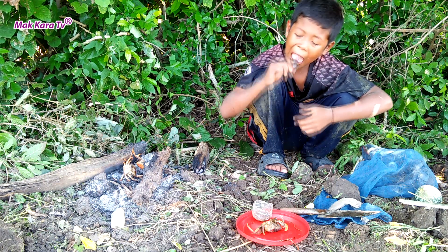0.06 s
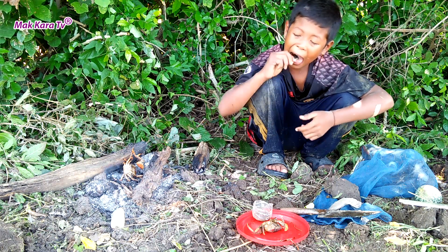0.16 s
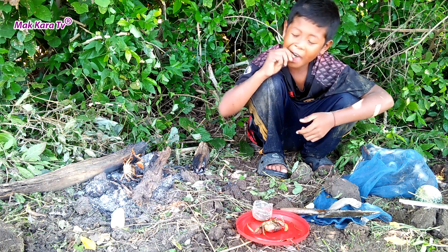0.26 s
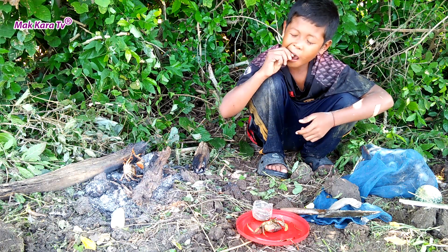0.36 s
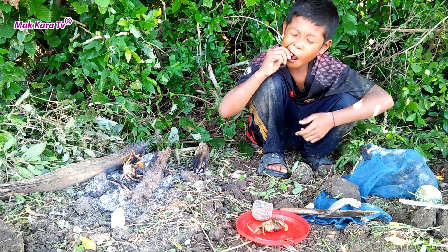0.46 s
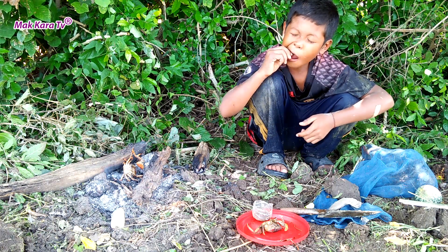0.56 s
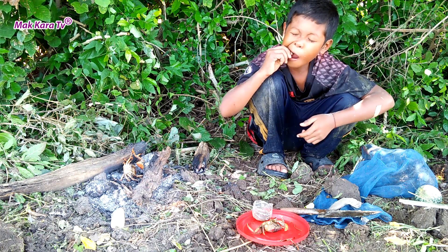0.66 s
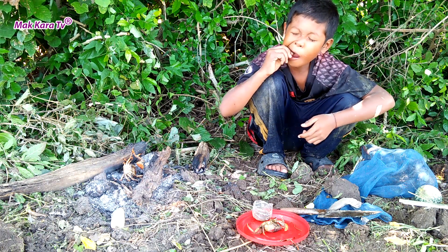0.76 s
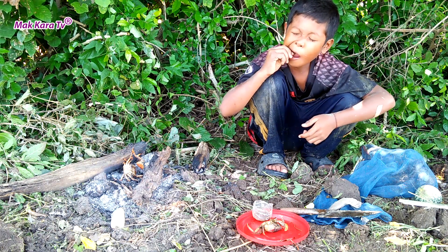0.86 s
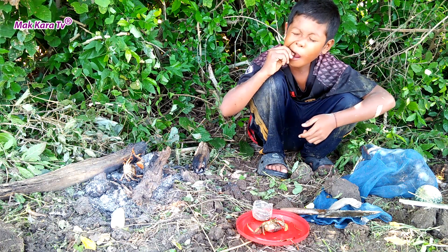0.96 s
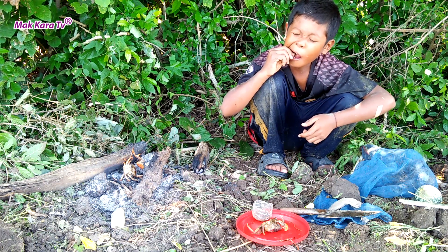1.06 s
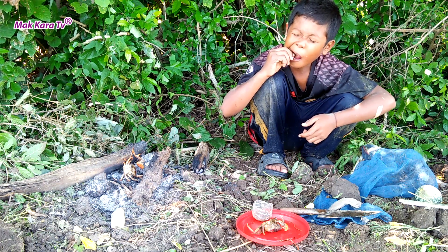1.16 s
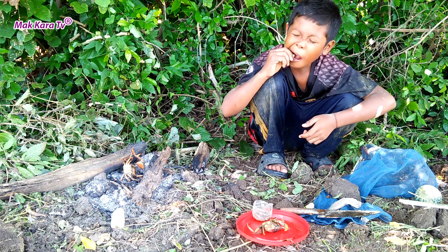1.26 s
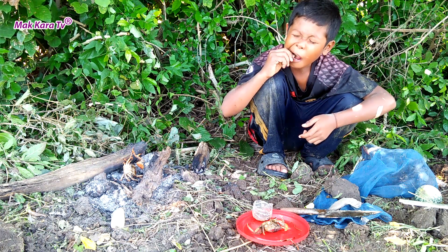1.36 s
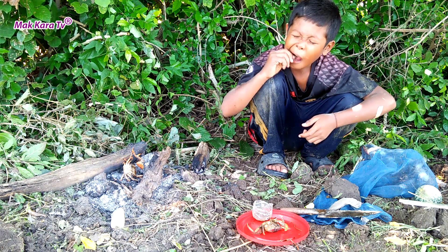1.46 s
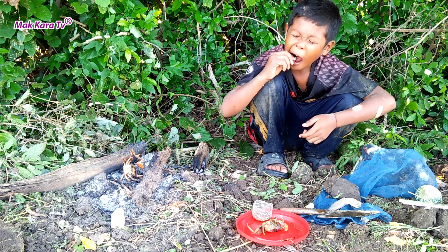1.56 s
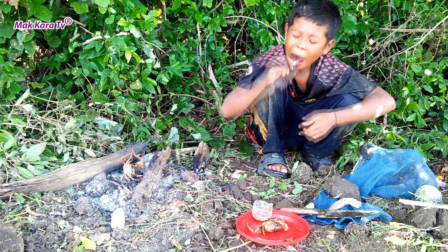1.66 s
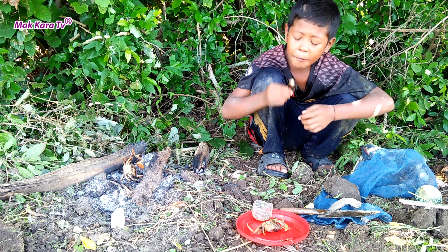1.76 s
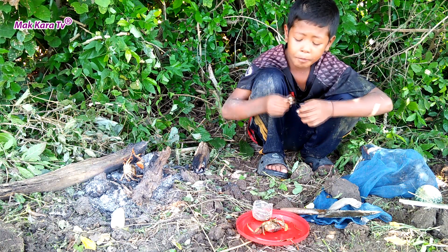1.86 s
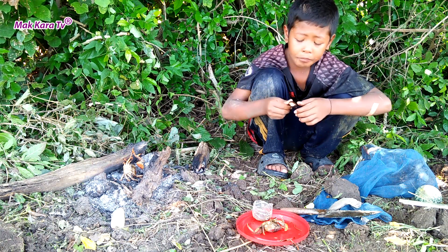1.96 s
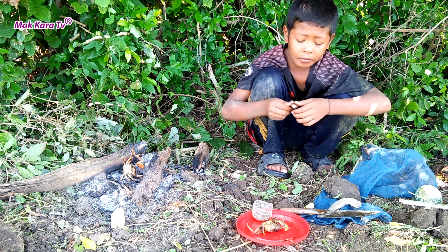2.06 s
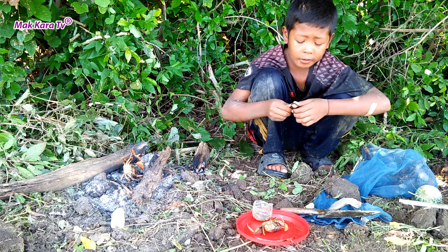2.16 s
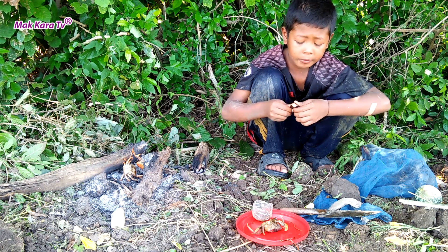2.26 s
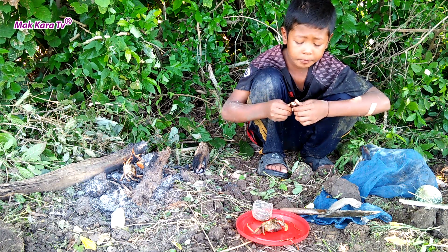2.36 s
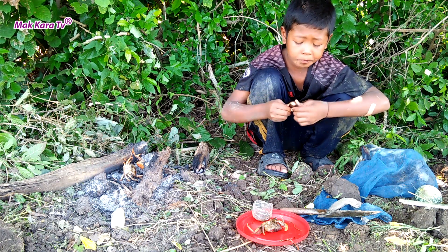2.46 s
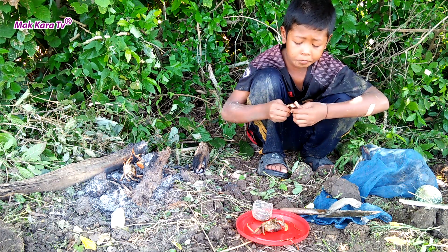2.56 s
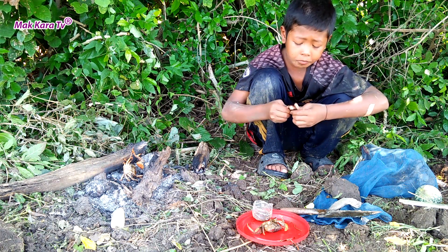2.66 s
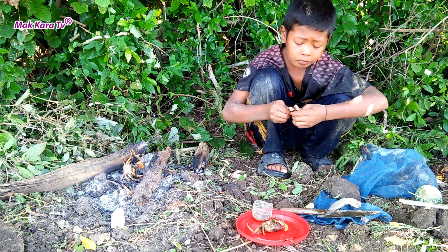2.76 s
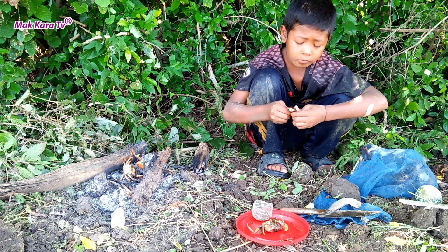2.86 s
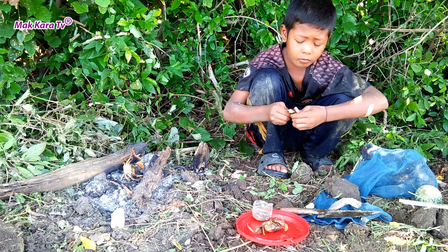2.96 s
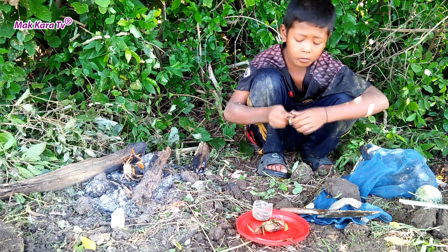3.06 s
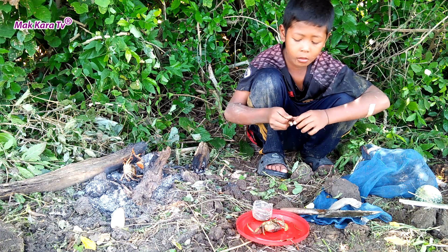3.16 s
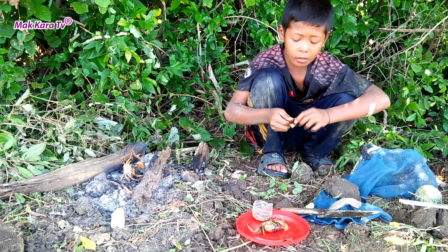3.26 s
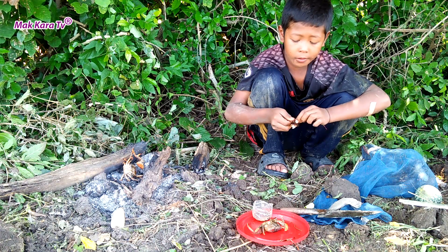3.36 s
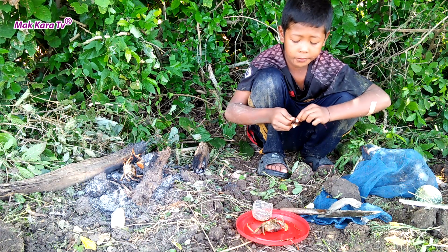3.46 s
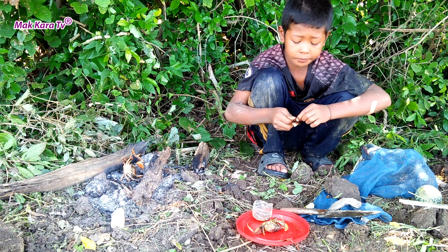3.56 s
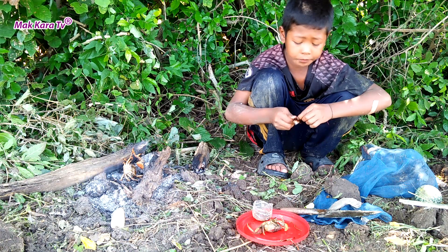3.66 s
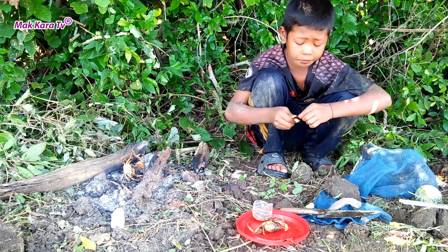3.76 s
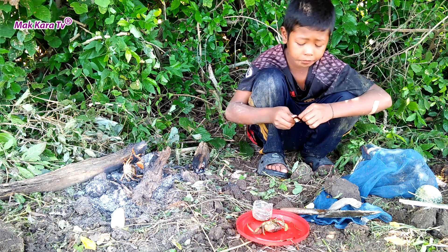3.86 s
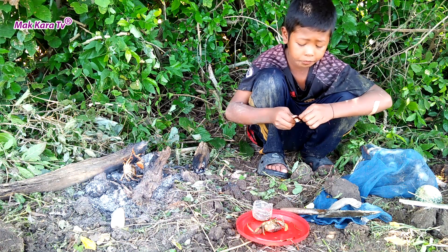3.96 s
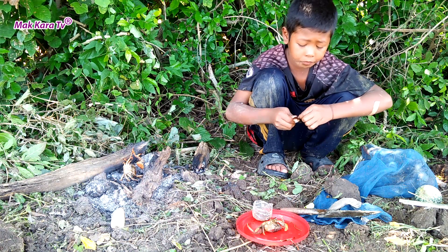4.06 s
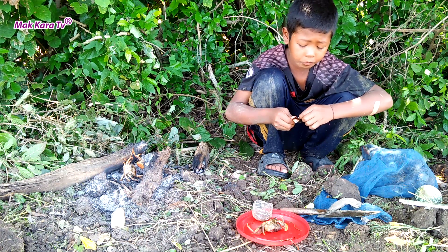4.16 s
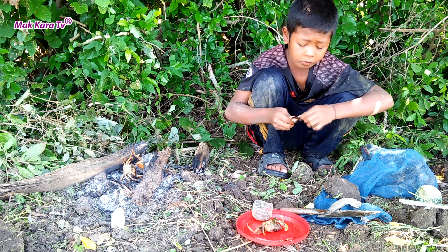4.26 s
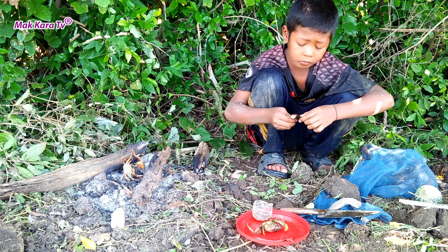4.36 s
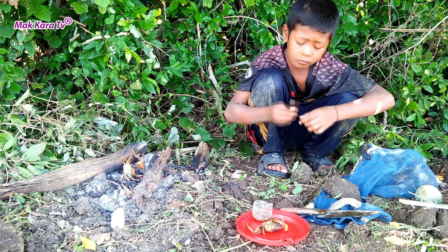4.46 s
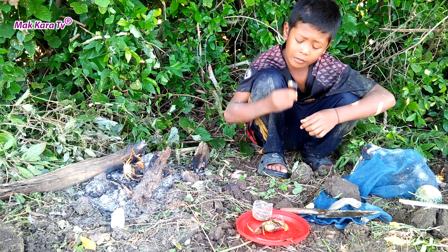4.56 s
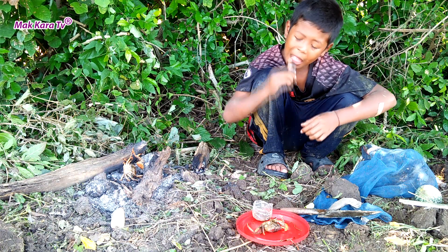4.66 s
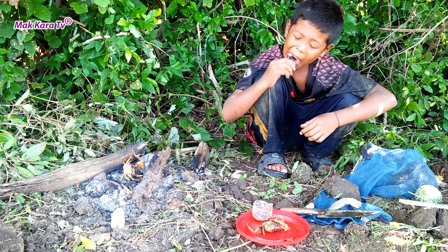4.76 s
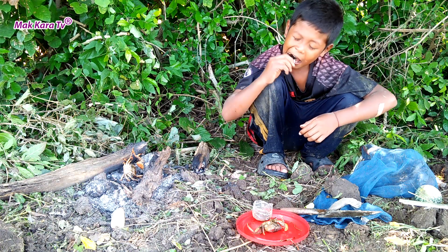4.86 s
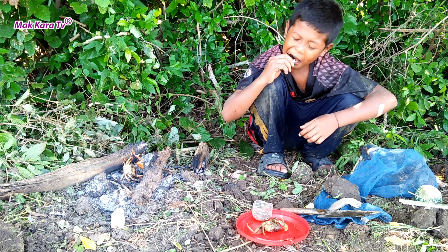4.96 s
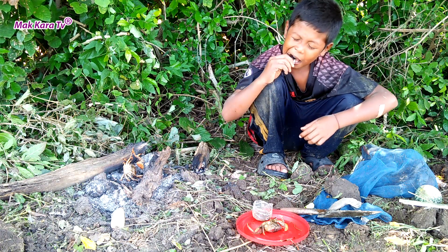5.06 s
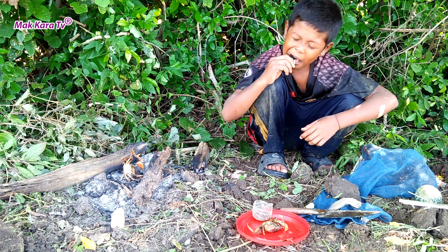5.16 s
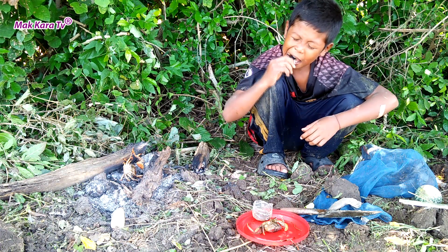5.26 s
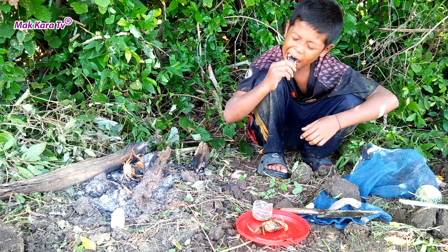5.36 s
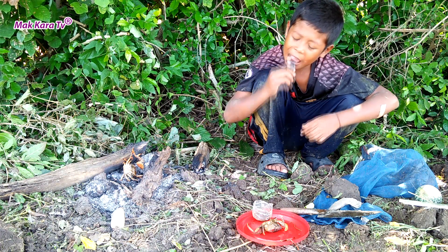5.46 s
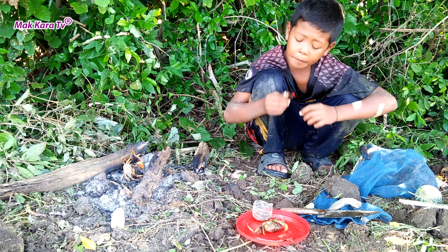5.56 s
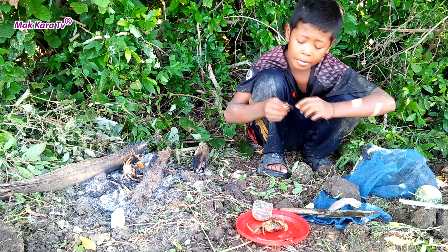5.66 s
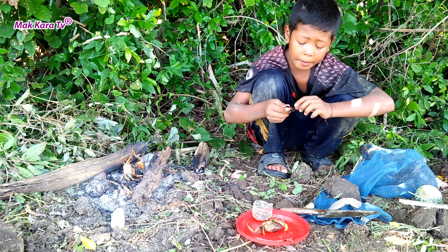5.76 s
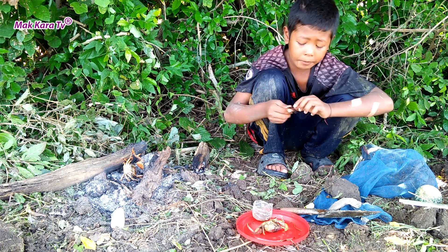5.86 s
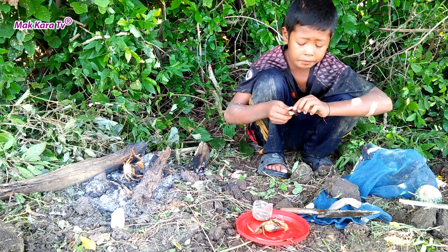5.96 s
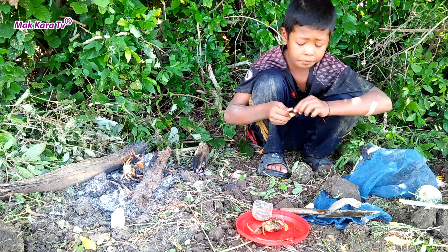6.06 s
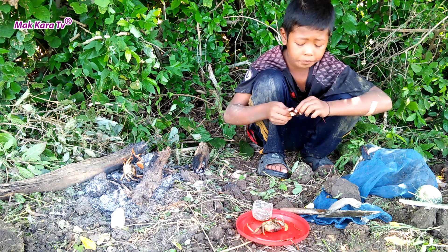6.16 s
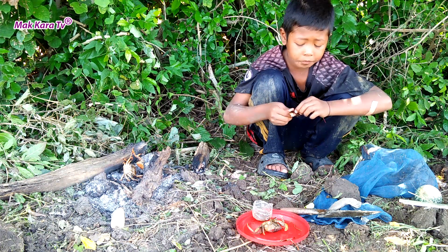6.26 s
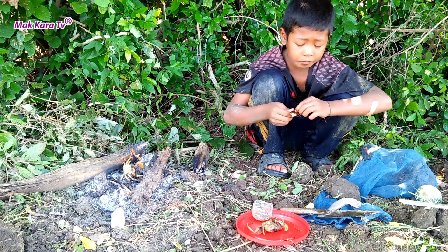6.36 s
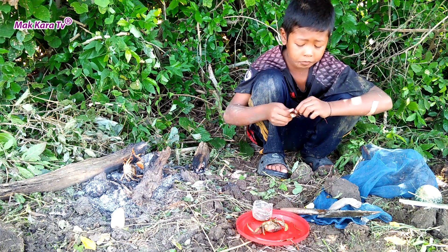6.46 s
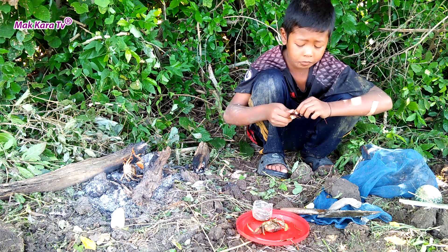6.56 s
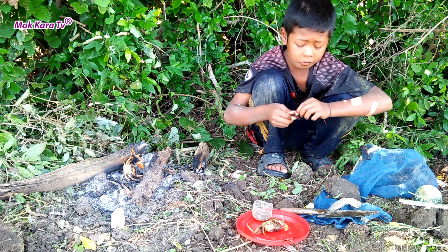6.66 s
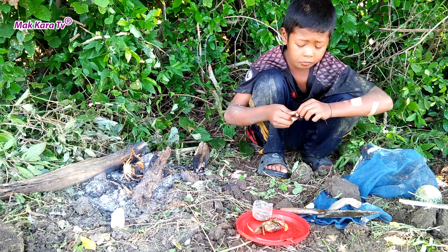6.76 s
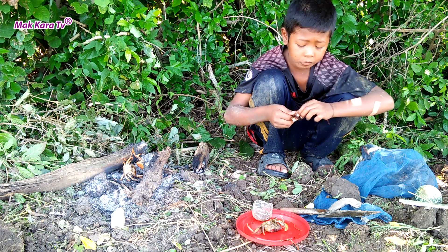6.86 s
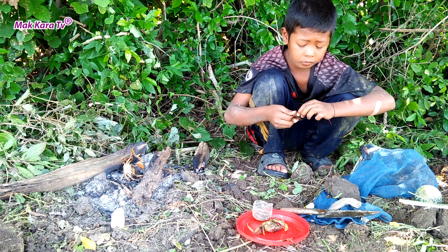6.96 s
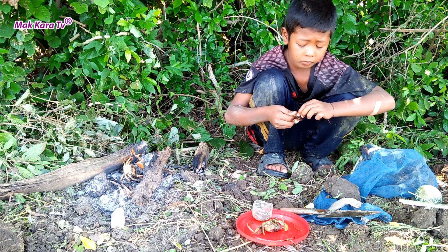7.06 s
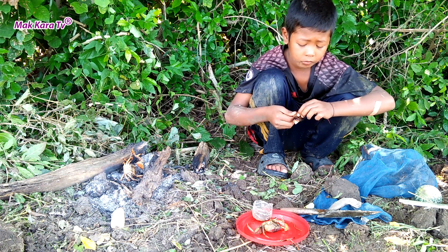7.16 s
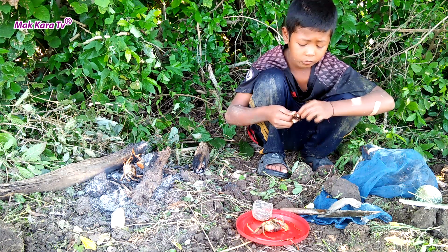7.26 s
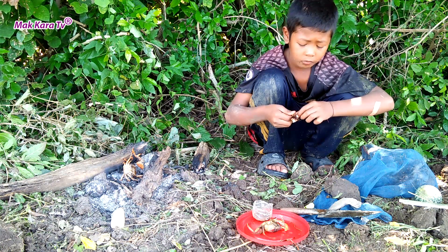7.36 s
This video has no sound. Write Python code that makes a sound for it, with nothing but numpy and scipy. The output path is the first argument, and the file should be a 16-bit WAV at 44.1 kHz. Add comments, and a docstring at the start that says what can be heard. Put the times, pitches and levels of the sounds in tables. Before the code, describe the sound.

Close outdoors, brittle shell cracks crisply between teeth in an uneven run about a second in, followed by small wet smacks and faint picking by fingers. A long quiet stretch passes, then a tight cluster of cracks snaps past five seconds. Soft rustling comes and goes. Beneath it all, low air rumble and a far single-cylinder engine chug steadily.

```python
"""Sharp shell cracks in two bouts: someone squatting by a small fire bites through a grilled crab leg.
Each crack is an impulse and torn noise grains, ringing the splinter and mouth; the hedge scatters it.
Lips smack and fingers pick in resonant ticks; a soft rustle of shaped noise comes and goes.
Far away a slow single-cylinder engine chugs as a train of low pulses, with a thin wavering whine,
over a low rumble of air, small buffets and a distant wash, all made from coloured noise."""
import sys
import numpy as np
from scipy import signal
from scipy.fft import rfft, irfft, next_fast_len
from scipy.io import wavfile
from scipy.ndimage import uniform_filter1d, map_coordinates

SR = 44100
rng = np.random.default_rng(int(sys.argv[2]) if len(sys.argv) > 2 else 0)


def generate_wav(signal):
    """Clip the signal to [-1, 1] and save it as 16-bit WAV at the path in sys.argv[1]."""
    frames = np.transpose(np.atleast_2d(signal))
    scaled = np.clip(frames, -1, 1) * 32767
    pcm = np.round(scaled).astype(np.int16)
    wavfile.write(sys.argv[1], SR, pcm)


N = 326635  # samples


def amp(db):
    """Level to amplitude ratio: 20 dB is a factor of ten."""
    return 10 ** (np.asarray(db) / 20)


def unit(x):
    """Power normalisation: x at rms 1."""
    return x / np.sqrt(np.mean(x ** 2) + 1e-20)


def sized(x):
    """Energy normalisation: x with its squares summing to 1."""
    return x / np.linalg.norm(x)


def along(points, hz):
    """Logarithmic frequency scale: interpolate (f/Hz, value) points on it."""
    f, v = np.transpose(points)
    return np.interp(np.log(hz + 1), np.log(f + 1), v)


def curves(rows):
    """Linear interpolation: one value per sample for each column after the time."""
    s, *cols = np.transpose(rows)
    return [np.interp(np.arange(N) / SR, s, c) for c in cols]


def wobble(rate):
    """Band-limited fluctuation: a smooth curve through random knots, rate of them a second."""
    knots = rng.standard_normal(int(N * rate / SR) + 4)
    return map_coordinates(knots, [np.arange(N) * rate / SR])


def swell(s, length):
    """Gaussian envelope: a bell of standard deviation length, in seconds, around time s."""
    return np.exp(-((np.arange(N) / SR - s) / length) ** 2 / 2)


def fade(t, t60):
    """Exponential decay: 60 dB lost in t60 seconds."""
    return amp(-60 * t / t60)


def filtered(x, response):
    """Linear filtering: the spectrum of x times a response of frequency."""
    m = next_fast_len(len(x) + 8192)  # zero padding leaves room for the filter's tail
    return irfft(rfft(x, m) * response(np.fft.rfftfreq(m, 1 / SR)), m)[:len(x)]


def coloured(x, spectrum):
    """Minimum phase: a causal filter of the given (f/Hz, level/dB) shape, by folding its cepstrum."""
    size = 2048
    cepstrum = irfft(np.log(amp(along(spectrum, np.fft.rfftfreq(size, 1 / SR)))))
    cepstrum[1:size // 2] *= 2
    cepstrum[size // 2 + 1:] = 0
    impulse_response = irfft(np.exp(rfft(cepstrum)))
    return signal.fftconvolve(x, impulse_response)[:len(x)]


def resonance(x, hz, width):
    """Damped oscillator: x through one resonance of the given width in Hz."""
    return filtered(x, lambda f: 1j * f * width / (hz * hz - f * f + 1j * f * width))


def band(x, hz, width):
    """Cascaded resonators: two equal resonances in series, with the output energy set to 1."""
    return sized(resonance(resonance(x, hz, width), hz, width))


def rush(spectrum, patchy_db):
    """Turbulent noise: random patches of gain in time and frequency, then a spectral shape, at rms 1."""
    z = signal.stft(rng.standard_normal(N), nperseg=1024)[2]
    across_hz = uniform_filter1d(rng.standard_normal(z.shape), size=5, axis=0)
    patches = unit(uniform_filter1d(across_hz, size=9, axis=1))
    noise = signal.istft(z * amp(patchy_db * patches), nperseg=1024)[1][:N]
    return unit(filtered(noise, lambda hz: amp(along(spectrum, hz))))


def scatter(decay):
    """Diffuse scattering: half a second of fresh decaying noise of energy 1, t60 varying with frequency."""
    hz, t, z = signal.stft(rng.standard_normal(SR // 2), SR, nperseg=128)
    decaying = z * fade(t, along(decay, hz)[:, None])
    return sized(signal.istft(decaying, SR, nperseg=128)[1][:SR // 2])


def add(track, s, sound):
    """Superposition: mix a sound into the track at time s."""
    start = max(round(s * SR), 0)
    track[start:start + len(sound)] += sound[:max(N - start, 0)]


# hands rubbing on shell and sleeve: (start t/s, length t/s, level/dB)
RUB_EVENTS = [(0, 0.088, -81), (0.095, 0.017, -51), (0.11, 0.12, -69.5), (0.277, 0.33, -82.5),
              (0.642, .07, -82), (0.72, 0.72, -76.5), (0.914, 0.88, -67.5), (1.606, 0.12, -62),
              (1.77, 0.28, -66), (1.897, 0.062, -62.5), (2.323, 0.12, -81), (2.556, 0.099, -75),
              (2.967, 0.19, -78), (3.18, 0.22, -83), (3.476, 0.086, -79.5), (3.62, 0.083, -84),
              (4.126, 0.14, -71), (4.378, 0.19, -76.5), (4.713, 0.088, -67.5), (4.79, 0.71, -73.5),
              (5.138, 0.011, -57.5), (5.307, 0.12, -65), (5.495, 0.15, -75), (5.781, 0.29, -76),
              (6.054, 0.51, -82), (6.4, 1.03, -77.5), (6.896, 0.19, -73.5), (7.227, 0.32, -75)]
# noise shape of the rustle: (f/Hz, relative level/dB)
RUSTLE_SPECTRUM = [(2000, -47), (3500, -14.5), (5700, -16.5), (7000, -9.5), (8200, -2.5), (9400, -0.5),
                   (11400, -6), (14000, -10)]
RUB_EDGE_S = 0.062  # longest rise or fall of a rub
LINGER_DB, LINGER_T60 = -2, 0.53  # a rub's scatter in the hedge
STILL_DB = -90.5  # rustle at rest


def rustle(grain_db=1.5):
    """Friction noise adds in power: each rub rises, holds, falls and lingers; leaves and embers rustle on."""
    time = np.arange(N) / SR
    power = np.zeros(N)
    for s, length, db in RUB_EVENTS:
        to_nearest_end = np.minimum(time - s, s + length - time)
        contact = np.clip(to_nearest_end / min(RUB_EDGE_S, length / 2), 0, 1)
        power += (amp(db) * contact) ** 2
    keep = fade(1 / SR, LINGER_T60) ** 2  # power kept from one sample to the next
    linger = amp(LINGER_DB) ** 2 * signal.lfilter([1 - keep], [1, -keep], power)
    level = np.sqrt(power + linger + amp(STILL_DB) ** 2) * amp(1.4 * wobble(23))
    return level * unit(amp(grain_db * wobble(900)) * rush(RUSTLE_SPECTRUM, patchy_db=2.0))


# strength of the moving air: (t/s, level/dB)
RUMBLE_LEVEL = [(.6, -56), (1.6, -56), (2.2, -57), (2.7, -59), (3.8, -54.5), (4.7, -53.5), (5.1, -51.5),
                (5.45, -60.5), (7.41, -56.5)]
# noise shape of the moving air: (f/Hz, relative level/dB)
RUMBLE_SPECTRUM = [(15, -45), (33, -15), (55, 0), (75, -0.5), (120, -6.5), (165, -16.5), (215, -16.5),
                   (330, -22), (390, -51.5), (1200, -120)]


def air_rumble(lumps_db=2.0):
    """Low-frequency turbulence: moving air is bass noise with a lumpy random envelope."""
    lumps = amp(lumps_db * wobble(16))
    return amp(curves(RUMBLE_LEVEL)[0]) * unit(lumps * rush(RUMBLE_SPECTRUM, patchy_db=1.5))


# mean level of the distant wash, before its flutter: (t/s, level/dB)
WASH_LEVEL = [(0.0, -69), (0.74, -68.5), (1.55, -68.5), (1.73, -69), (1.94, -70), (4.12, -70.5),
              (4.95, -66), (5.18, -66), (5.4, -71), (5.86, -70), (6.21, -72.5), (7.41, -68)]
# noise shape of the distant wash: (f/Hz, relative level/dB)
WASH_SPECTRUM = [(220, -38), (380, -17.5), (429, -5), (522, -16), (580, -6), (664, -9.5), (833, -5),
                 (1270, -10), (1640, -9.5), (1850, -15), (2430, -19), (2660, -21), (3710, -35.5),
                 (9600, -33.5), (14000, -52.5)]


def distant_wash():
    """Diffuse background: stationary coloured noise under a slow level curve with a slight flutter."""
    return amp(curves(WASH_LEVEL)[0] + 0.88 * wobble(25)) * rush(WASH_SPECTRUM, patchy_db=3.0)


# a faint far whine that swells once: (f/Hz, swell level/dB, swell middle t/s, bell half length t/s)
WHINE_TONES = [(1620, -76.5, 4.55, .32), (1124, -79.5, 4.9, 0.13)]
WHINE_REST_DB = -12  # steady part, relative to the swell


def whine(waver_hz=13, flutter_db=3.2):
    """Frequency modulation: thin tones waver and flutter at random, barely above the background."""
    out = np.zeros(N)
    for hz, db, s, length in WHINE_TONES:
        frequency = hz + waver_hz * (wobble(7) + wobble(70))
        tone = np.sin(2 * np.pi * np.cumsum(frequency) / SR)
        fluttering = unit(tone * amp(flutter_db * wobble(22)))
        out += amp(db) * (amp(WHINE_REST_DB) + swell(s, length)) * fluttering
    return out


# engine speed: (t/s, firings per second f/Hz)
FIRING_RATE = [(0, 11.796), (1, 11.625), (1.9, 11.872), (2.5, 11.724), (3.7, 11.954), (5, 11.555),
               (6, 11.739), (7.41, 11.782)]
# engine loudness as it carries over the distance: (t/s, relative level/dB)
CHUG_LEVEL = [(1, -60), (1.45, -69.5), (1.8, -60.5), (2.7, -63.5), (3.3, -60), (4.5, -58), (5.4, -65),
              (6.3, -64.5), (7.2, -59)]
# what one engine cycle sends out: (delay t/s, f/Hz, mean level/dB, bell half length t/s)
PUFF_BURSTS = [(-0.01907, 74, 1.5, 0.0091), (-.001, 57, 0.5, 0.014), (-0.0045, 120.2, 6.5, 0.005),
               (0, 283.6, 3.3, 0.0047)]
# decay of the engine's sound among the trees: (f/Hz, t60 t/s)
TREE_DECAY = [(60, 0.24), (300, 0.73)]
PUFF_SCATTER_DB = 1.3  # random spread of each burst's level


def engine(echo_s=.021, echo_db=-6, trees_db=-5.5, level_db=5.5):
    """Periodic pulses: a low intake gulp and an exhaust pop, then an inverted echo and a blur from the trees."""
    time = np.arange(N) / SR
    cycles = np.cumsum(curves(FIRING_RATE)[0]) / SR
    firings = np.interp(np.arange(int(cycles[-1]) + 1), cycles, time) + .006
    out, t = np.zeros(N), np.arange(-SR // 20, SR // 20) / SR
    for s in firings[1:]:
        puff = np.zeros(len(t))
        for delay, hz, db, length in PUFF_BURSTS:
            u = t - delay
            burst = np.exp(-(u / length) ** 2 / 2) * np.cos(2 * np.pi * hz * u)
            # no two cycles burn alike
            puff += amp(db + PUFF_SCATTER_DB * rng.standard_normal()) * burst
        add(out, s + t[0], -puff)
        add(out, s + t[0] + echo_s, amp(echo_db) * puff)
        add(out, s + t[0], amp(trees_db) * signal.fftconvolve(puff, scatter(TREE_DECAY)))
    return out * amp(curves(CHUG_LEVEL)[0] + level_db)


# soft buffets of air on the microphone: (middle t/s, relative level/dB, bell half length t/s)
BUFFET_EVENTS = [(0.084, -36, 0.0074), (0.12, -42.5, 0.013), (0.271, -36, 0.0044), (0.49, -42.5, 0.026),
                 (1.293, -42.5, 0.028), (1.781, -41, 0.0078), (2.03, -49.5, 0.023), (2.133, -44.5, 0.0081),
                 (2.395, -40, 0.0079), (2.588, -48.5, 0.079), (2.849, -41, 0.033), (2.945, -38.5, 0.01),
                 (4.572, -46.5, 0.056), (5.054, -48, 0.059)]
# noise shape of the small eddies: (f/Hz, relative level/dB)
EDDY_SPECTRUM = [(15, -41.5), (35, -9), (55, 1.5), (80, 1.5), (120, -13), (200, -24.5), (400, -63),
                 (1200, -120)]


def buffets(level_db=-1.0):
    """Turbulent pressure: small eddies push on the microphone in brief swells of low noise."""
    envelope = sum(amp(db + level_db) * swell(s, length) for s, db, length in BUFFET_EVENTS)
    return envelope * rush(EDDY_SPECTRUM, patchy_db=-4.0)


# gnawing and picking at the shell:
# (middle t/s, bell half length t/s, level before muffling/dB, centre f/Hz, pitch spread/octaves)
GNAW_SPELLS = [(0.498, 0.15, -71, 1400, 0.21), (0.8, .05, -68, 1790, 0.26), (1.903, 0.057, -77, 2200, 0.22),
               (4.453, 0.057, -76, 2150, .1), (4.773, 0.058, -69.5, 1290, 0.084),
               (4.755, 0.043, -79, 2600, 0.18), (5.361, .06, -71.5, 1690, 0.39),
               (7.097, 0.26, -87, 1710, .3)]
TICKS_PER_S, TICK_SCATTER_DB = 260, 3.5  # mean rate; random spread of size
TICK_CYCLES = 13  # cycles in which a tick fades by 60 dB


def gnawing(muffle_hz=2600):
    """Stick-slip: teeth and nails catch in tiny ticks of random pitch and size, muffled by lips and fingers."""
    out, t = np.zeros(N), np.arange(SR // 20) / SR
    for s, length, db, hz, spread in GNAW_SPELLS:
        ticks, count = np.zeros(N), int(6 * length * TICKS_PER_S)
        for k, (shift, pitch, size) in enumerate(rng.standard_normal((count, 3))):
            f = hz * 2 ** (spread * pitch)
            tick = np.sin(2 * np.pi * f * t) * fade(t, TICK_CYCLES / f) * (1 - np.exp(-f * t))
            add(ticks, s + (k - count / 2 + shift) / TICKS_PER_S, amp(TICK_SCATTER_DB * size) * tick)
        effort = swell(s, length)
        weighted_rms = np.sqrt(np.average(ticks ** 2, weights=effort))
        out += amp(db) * effort * ticks / weighted_rms
    return filtered(out, lambda hz: 1 / np.sqrt(1 + (hz / muffle_hz) ** 10))


# soft smacks and scrapes of lips and fingers:
# (t/s, peak level/dB, resonance f/Hz, rise time constant t/s, t60 t/s)
SMACK_EVENTS = [(.385, -65, 2300, 0.0033, 0.068), (0.495, -52.5, 1480, 0.0008, 0.07),
                (0.554, -61.5, 1300, 0.0075, .07), (.745, -62, 2100, 0.008, 0.08),
                (.77, -67, 2680, 0.011, 0.14), (.835, -57.5, 1550, .003, .07),
                (1.664, -50, 1930, 0.0059, 0.2), (1.665, -60, 854, .006, .16),
                (1.688, -52, 1600, 0.024, 0.077), (1.806, -52, 1260, 0.03, 0.13),
                (1.815, -61.5, 2720, .012, 0.18), (2.325, -63.5, 2700, .002, 0.088),
                (3.199, -61.5, 1410, 0.00064, 0.022), (3.514, -50, 1740, 0.00056, 0.025),
                (3.514, -67.5, 2750, 0.0017, 0.036), (3.514, -69, 6250, .0008, 0.011),
                (4.15, -59.5, 1565, 0.008, 0.2), (4.159, -65.5, 2970, 0.011, 0.34),
                (4.94, -56, 1090, .002, .07), (5.03, -67, 2850, .006, 0.069), (5.13, -60, 1368, .002, .14),
                (5.925, -65.5, 2160, 0.0041, 0.042), (6.37, -65.5, 1840, .002, .05),
                (6.885, -64.5, 1467, 0.0017, .05), (6.95, -64, 2570, 0.0037, 0.082),
                (7.205, -67.5, 2900, .002, .06), (7.254, -52.5, 900, 0.00061, 0.12),
                (7.256, -65, 2070, 0.0018, .07), (7.3, -71, 2550, .008, .16)]
TICK_OCTAVES, WIDEN_OCTAVES_PER_S = .17, 16  # resonance width, and its growth with the rise time


def smacks():
    """Resonant filtering: moist noise ticks in one resonance, broader the slower the smack rises."""
    out, t = np.zeros(N), np.arange(SR // 4) / SR
    for s, db, hz, rise, t60 in SMACK_EVENTS:
        ticks = rng.standard_normal(len(t)) * np.exp(.5 * rng.standard_normal(len(t)))
        ticks *= fade(t, t60) * (1 - np.exp(-t / rise))
        width = TICK_OCTAVES + WIDEN_OCTAVES_PER_S * rise
        smack = filtered(ticks, lambda f: 1 / (1 + (np.log2((f + 1) / hz) / width) ** 2) ** 1.2)
        add(out, s, amp(db) * smack / np.abs(smack).max())
    return out


CRACK_TIME = np.arange(SR // 2) / SR  # seconds after a crack begins
TEAR_T60 = 0.016  # s


def grain_burst(delay, t60, grain_db=6.5):
    """Impulsive noise: uneven grains that start at the delay and decay, with energy 1."""
    t = CRACK_TIME
    unevenness = np.clip(rng.standard_normal(len(t)), -2, 2)
    grains = rng.standard_normal(len(t)) * amp(grain_db * unevenness)
    return sized(grains * (t >= delay) * fade(np.abs(t - delay), t60))


def mode(hz, t60):
    """Modal ringing: a decaying sine with a 1 ms onset constant and energy 1."""
    t = CRACK_TIME
    return sized(np.sin(2 * np.pi * hz * t) * fade(t, t60) * (1 - np.exp(-t / 0.001)))


# small slips that follow each snap: (mean-scale delay t/s before random stretch, relative level/dB)
SLIP_EVENTS = [(.0008, -7), (.0016, -5.5), (.0024, -9.5), (.0036, -11)]


def fracture(tearing_db, snap_t60=0.0081, grit_db=-4.5, slip_t60=0.00054, tear_db=-9):
    """Brittle fracture: strain is released in one impulse, then in slips and tearing grains."""
    slips = 0
    for delay, slip_db in SLIP_EVENTS:
        slips = slips + amp(slip_db) * grain_burst(delay * rng.uniform(0.73, 1.2), slip_t60)
    grit = amp(grit_db) * grain_burst(0, snap_t60)
    tear = amp(tear_db) * grain_burst(0, TEAR_T60)
    return sized((CRACK_TIME == 0) + amp(tearing_db) * (grit + slips + tear))


# spectral shape of the shell's radiation: (f/Hz, relative level/dB)
SHELL_SPECTRUM = [(300, -39), (700, -31.5), (2200, -28), (3600, -25), (4600, -19.5), (6000, -18),
                  (7800, -4.5), (10600, -4), (12200, -7.5), (13300, -2.5), (14000, -5)]
# decay of the scatter from nearby leaves and ground: (f/Hz, t60 t/s)
NEAR_DECAY = [(1000, .09), (4000, 0.15), (9000, 0.091), (14000, 0.078)]
# decay of the scatter from the deeper hedge: (f/Hz, t60 t/s)
FAR_DECAY = [(1000, 0.9), (4000, 0.92), (9000, 0.4), (14000, 0.24)]
TREBLE_HZ = 11300  # where a crack's treble shelf turns
SPLINTER_T60 = 0.007  # s


def shell(snap, shell_hz, ring_db, splinter_hz, splinter_db, treble_db,
          near_db=-5, far_db=-19.0, dull_hz=14000, ring_width=1300):
    """Plate radiation: the snap rings shell and splinter; ground and hedge scatter back a duller answer."""
    answer = amp(near_db) * scatter(NEAR_DECAY) + amp(far_db) * scatter(FAR_DECAY)
    thrown = filtered(answer, lambda hz: 1 / np.sqrt(1 + (hz / dull_hz) ** 6))
    direct = filtered(snap, lambda hz: amp(treble_db * (1 - 1 / (1 + (hz / TREBLE_HZ) ** 16))))
    body = coloured(direct + thrown, SHELL_SPECTRUM)
    body = sized(body + amp(ring_db) * resonance(body, shell_hz, ring_width))
    return body + amp(splinter_db) * mode(splinter_hz, SPLINTER_T60)


# upper mouth resonances: (f/Hz with the mouth at rest, power of the lowest one's shift that they follow)
UPPER_MOUTH = [(2870, .26), (4100, .04), (4720, 0)]
# decay of the mouth's sound between hand and knees: (f/Hz, t60 t/s)
HAND_DECAY = [(1000, .1), (4000, 0.073)]
MOUTH_REST_HZ = 1300  # lowest resonance at rest
# the toneless bands of teeth and jaw
KNOCK_HZ, KNOCK_WIDTH, THUD_HZ, THUD_WIDTH = 1400, 900, 700.6, 390


def mouth(snap, hz1, db1, db2, db3, knock_db, thud_db,
          mouth_t60=0.018, mouth_width=440, rough_db=-8, low_db=10, high_db=5, pair_db=2, top_db=-1,
          knock_wet_db=-3, mouth_wet_db=-14):
    """Cavity resonance: the mouth rings, roughened by tearing, while teeth knock and the jaw thuds."""
    # as the jaw opens the lowest resonance rises; the higher ones follow less and less
    hz2, hz3, hz4 = [hz * (hz1 / MOUTH_REST_HZ) ** follow for hz, follow in UPPER_MOUTH]
    rings = [(hz1, db1 + low_db), (hz2, db2 + high_db), (hz3, db3 + pair_db), (hz4, db3 + pair_db + top_db)]
    nearby = scatter(HAND_DECAY)
    out = np.zeros(len(CRACK_TIME))
    for hz, level in rings:
        roughness = amp(rough_db) * band(grain_burst(0, TEAR_T60), hz, mouth_width)
        out += amp(level) * sized(mode(hz, mouth_t60) + roughness)
        # hand and knees scatter each ring as a short, broad rasp
        out += amp(mouth_wet_db + level) * band(nearby, hz, 2 * mouth_width)
    out += amp(knock_db) * band(snap + amp(knock_wet_db) * nearby, KNOCK_HZ, KNOCK_WIDTH)
    out += amp(thud_db) * band(snap, THUD_HZ, THUD_WIDTH)
    return out


# shell cracks, all levels relative: (t/s, level/dB, lowest mouth resonance f/Hz,
# low, middle and high mouth ring level/dB, shell ring f/Hz, ring level/dB, splinter f/Hz,
# splinter level/dB, tooth knock level/dB, jaw thud level/dB, tearing level/dB, treble level/dB)
CRACK_EVENTS = [ (0.9406, -35.5, 1590, -31, -28, -33, 9800, 12, 3670, -23, -38, -36, 5, 5),
                (1.0063, -25.5, 1290, -26, -40, -26, 8500, -6, 3630, -26.5, -35, -38, 3, 1),
                (1.0948, -13, 1265, -29, -22.5, -19, 10260, 8, 5130, -24, -44.5, -49, -3, 2),
                (1.1862, -2.5, 1287, -26, -35, -33, 9500, -4, 5700, -19.5, -40, -43, 0, -0.5),
                (1.4045, -35.5, 1224, -44, -21, -19.5, 9740, -1.5, 4150, -24, -42, -36, -1, 0),
                (1.494, -5.5, 1440, -39, -23.5, -21.5, 10800, 4.5, 4880, -28, -35, -36.5, 3, -0.5),
                (1.5265, -14.5, 1460, -28, -27, -17, 10700, 5.5, 4850, -22, -27.5, -42, 5, 1.5),
                (1.5883, -25.5, 1540, -38, -38, -33, 9000, -10, 5600, -21, -44, -40, 1, 2),
                (5.2257, -13, 1640, -38.5, -26.5, -34.5, 9900, 1, 3700, -21.5, -24, -33.5, -3, -2),
                (5.2436, -9, 1840, -53, -38, -37, 9000, 14, 5200, -40, -31, -40, -3, -7.5),
                (5.2443, -6.5, 1822, -24, -17, -36, 8700, 7, 3410, -16, -27, -28.5, -2.5, -7.5), ]


def cracks(level_db=7.0):
    """Source and resonator: each fracture excites the shell and the open mouth together."""
    out = np.zeros(N)
    for (s, db, hz1, db1, db2, db3, shell_hz, ring_db, splinter_hz, splinter_db,
         knock_db, thud_db, tearing_db, treble_db) in CRACK_EVENTS:
        snap = fracture(tearing_db)
        shell_sound = shell(snap, shell_hz, ring_db, splinter_hz, splinter_db, treble_db)
        mouth_sound = mouth(snap, hz1, db1, db2, db3, knock_db, thud_db)
        add(out, s, amp(db + level_db) * (shell_sound + mouth_sound))
    return out


def scene():
    """Superposition: the eater, the far engine and the open air add at one microphone."""
    air = air_rumble() + distant_wash() + buffets()
    eater = rustle() + gnawing() + smacks() + cracks()
    return (air + whine() + engine() + eater)[None]


TOP_HZ = 14280  # upper band limit


def record(dry, low_cut_hz=36):
    """Band limiting: the deepest bass is shed and the treble stops steeply at the upper limit."""
    dry = [filtered(x, lambda hz: 1 / np.sqrt(1 + (low_cut_hz / (hz + 1)) ** 10)) for x in dry]
    return np.array([filtered(x, lambda hz: 1 / np.sqrt(1 + (hz / TOP_HZ) ** 160)) for x in dry])


dry = scene()
out = record(dry)
generate_wav(out)
```